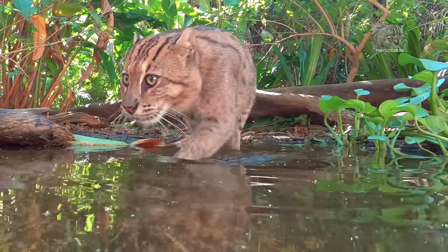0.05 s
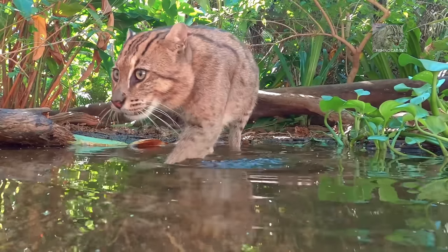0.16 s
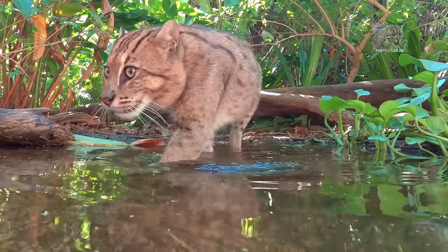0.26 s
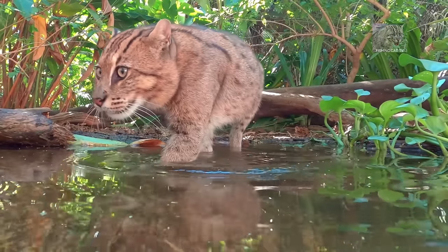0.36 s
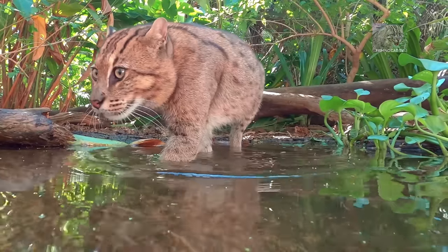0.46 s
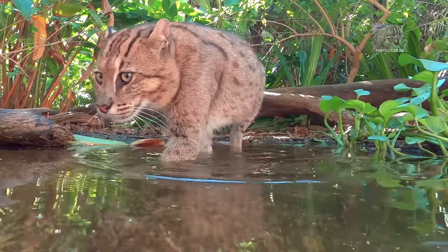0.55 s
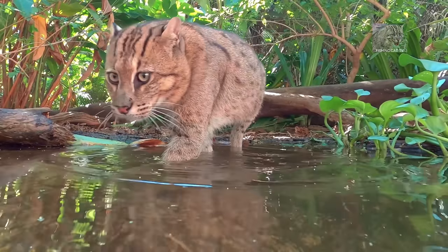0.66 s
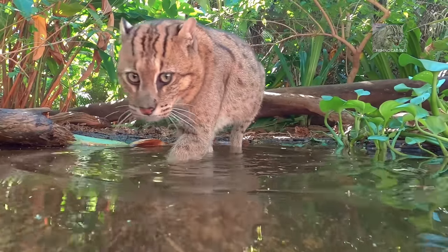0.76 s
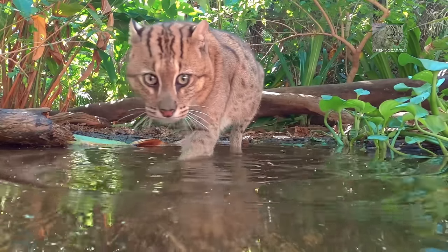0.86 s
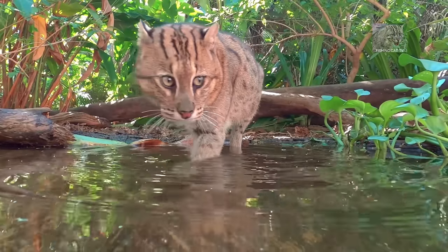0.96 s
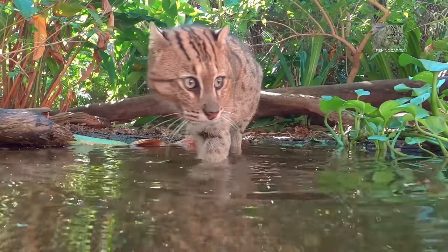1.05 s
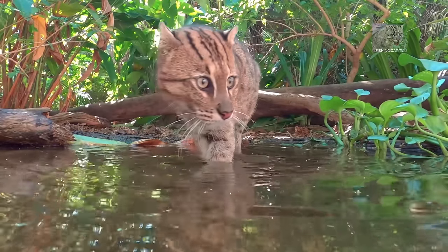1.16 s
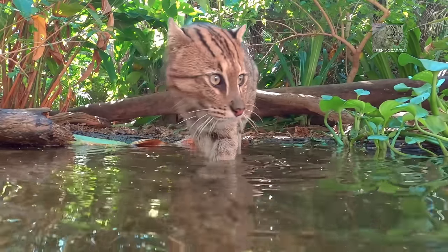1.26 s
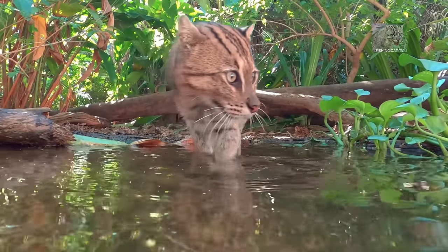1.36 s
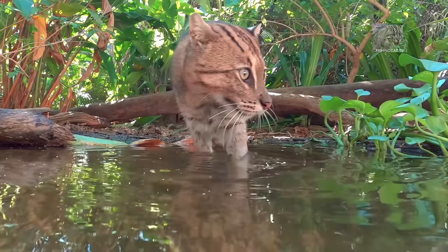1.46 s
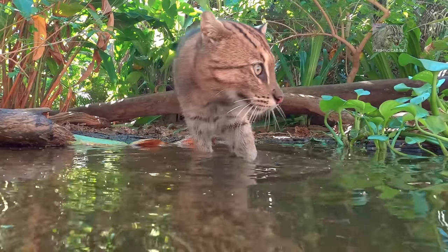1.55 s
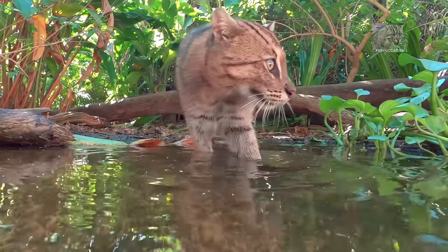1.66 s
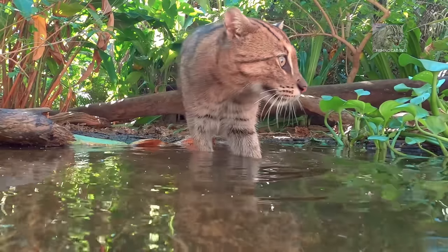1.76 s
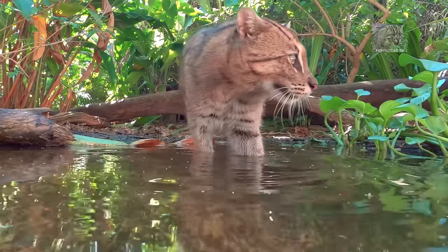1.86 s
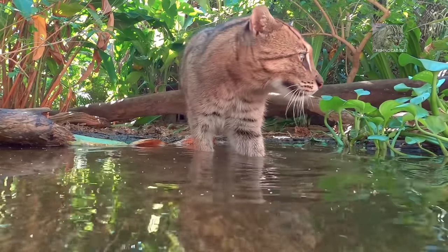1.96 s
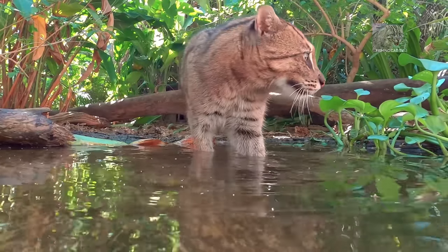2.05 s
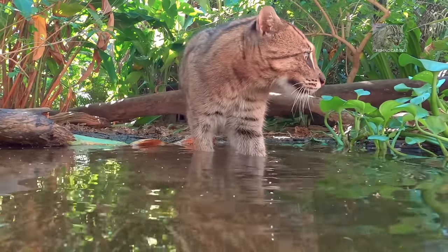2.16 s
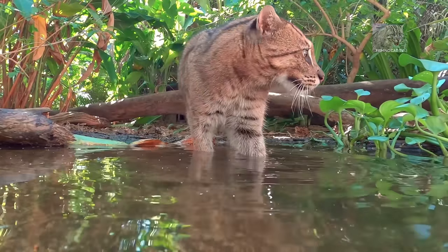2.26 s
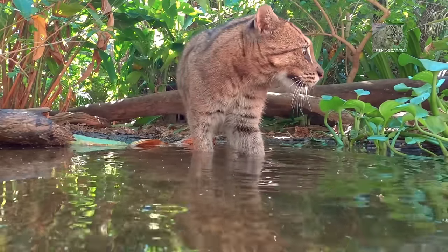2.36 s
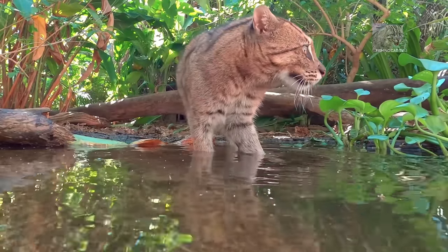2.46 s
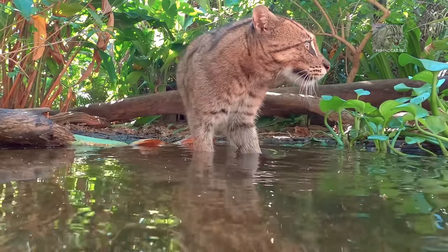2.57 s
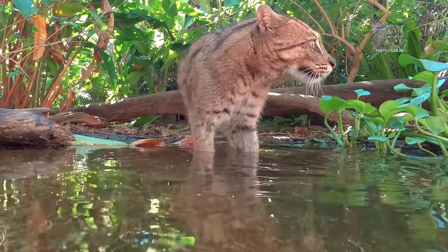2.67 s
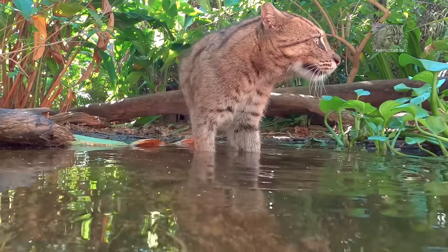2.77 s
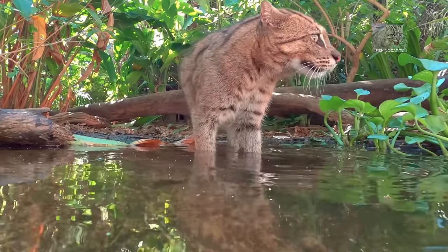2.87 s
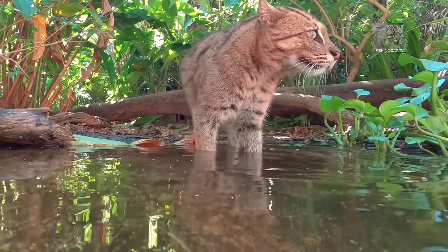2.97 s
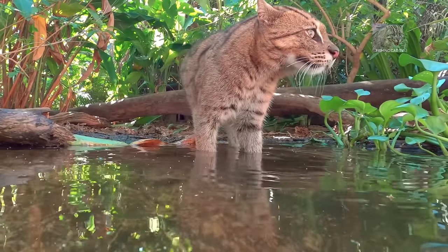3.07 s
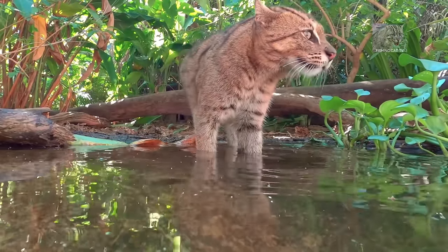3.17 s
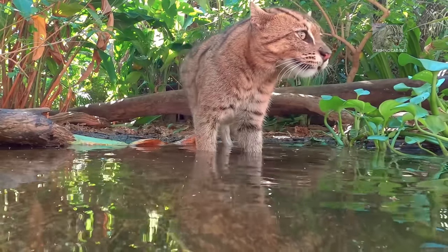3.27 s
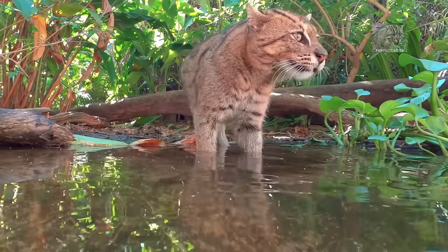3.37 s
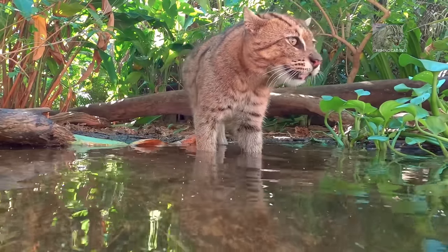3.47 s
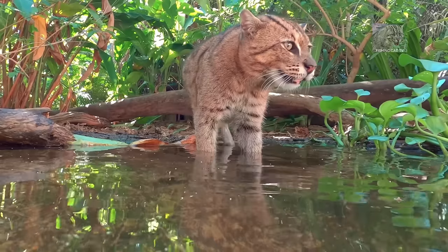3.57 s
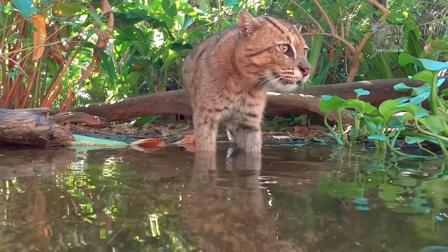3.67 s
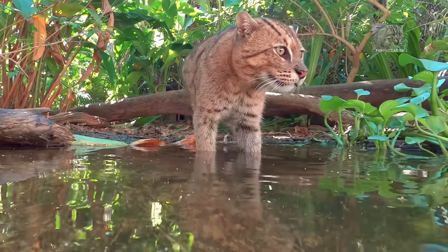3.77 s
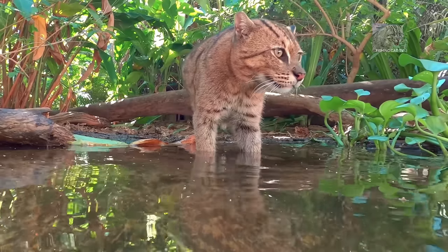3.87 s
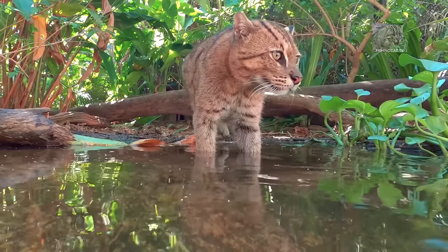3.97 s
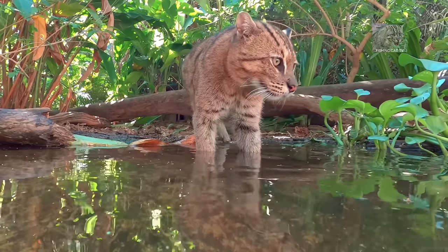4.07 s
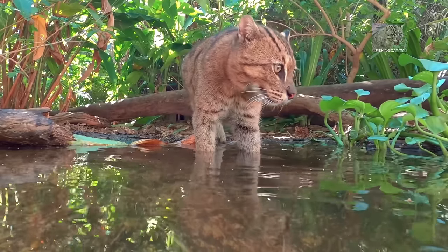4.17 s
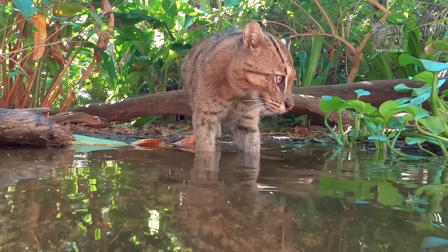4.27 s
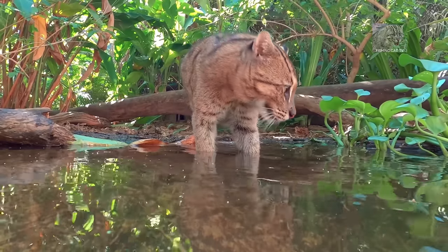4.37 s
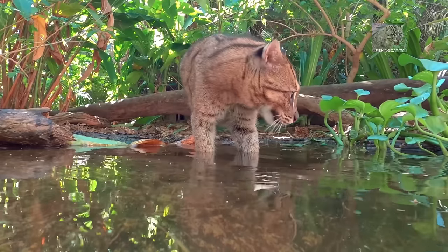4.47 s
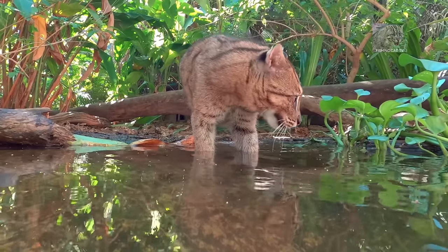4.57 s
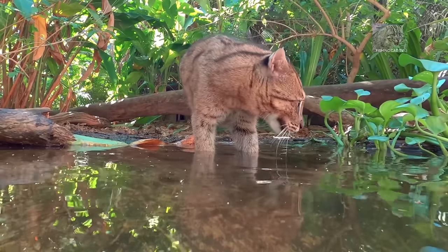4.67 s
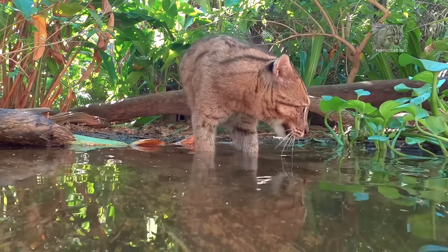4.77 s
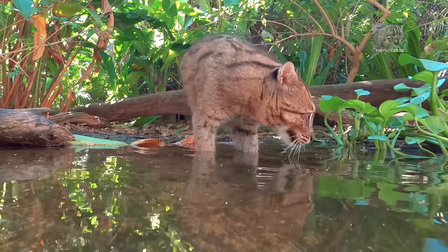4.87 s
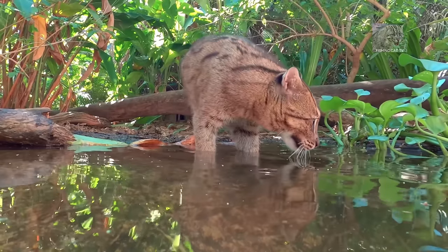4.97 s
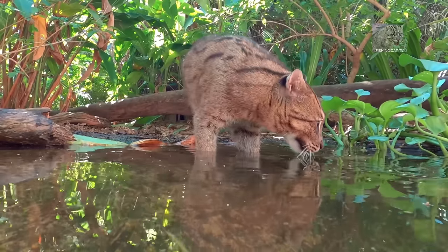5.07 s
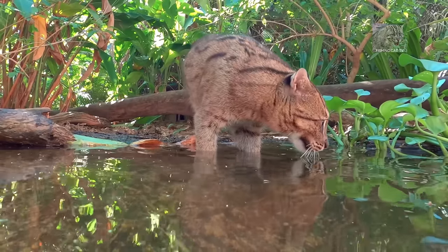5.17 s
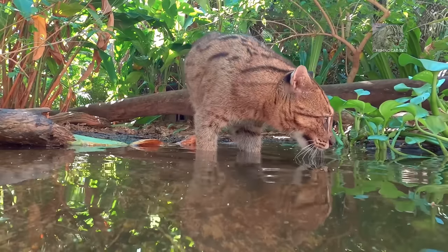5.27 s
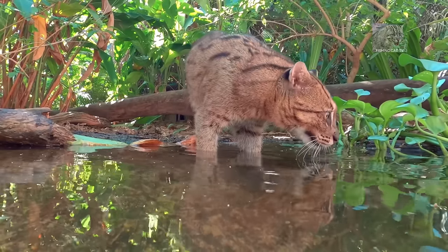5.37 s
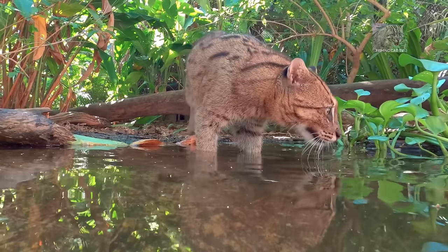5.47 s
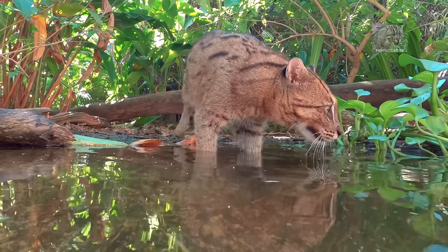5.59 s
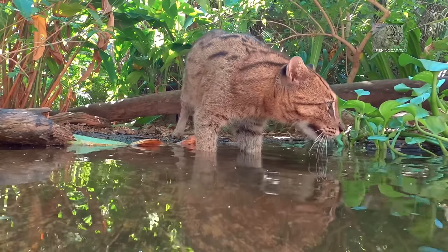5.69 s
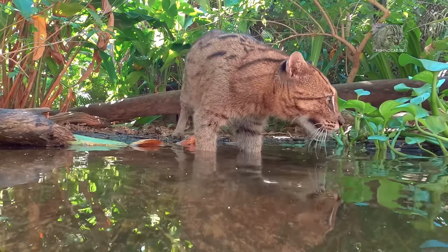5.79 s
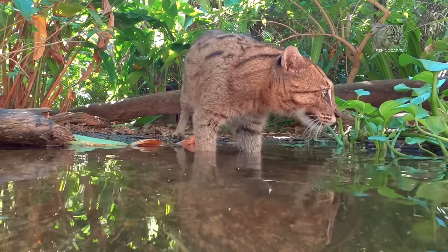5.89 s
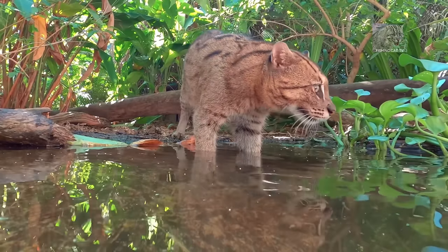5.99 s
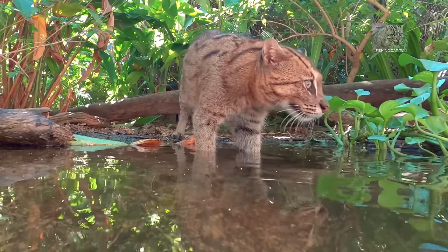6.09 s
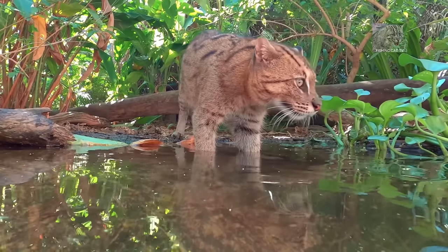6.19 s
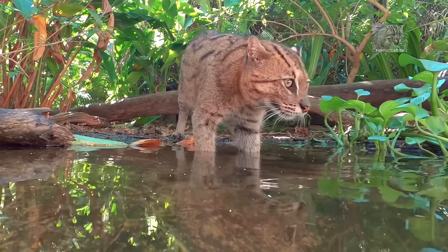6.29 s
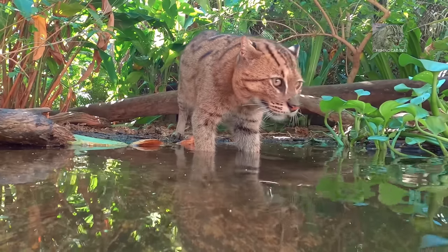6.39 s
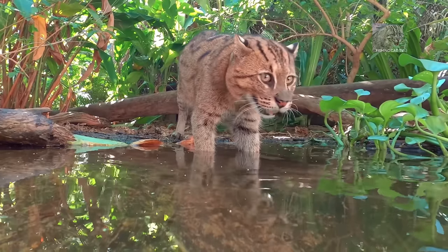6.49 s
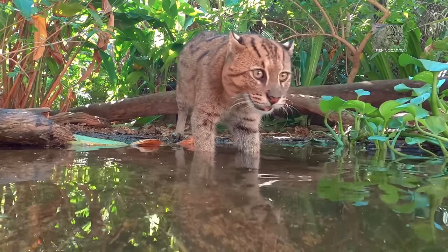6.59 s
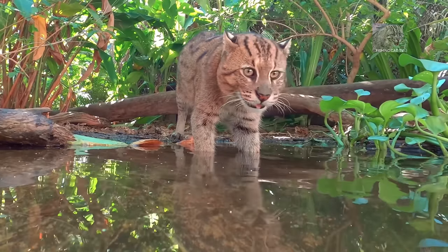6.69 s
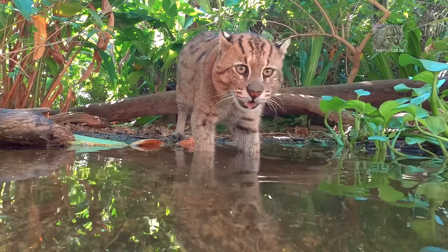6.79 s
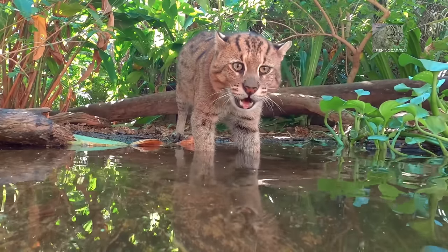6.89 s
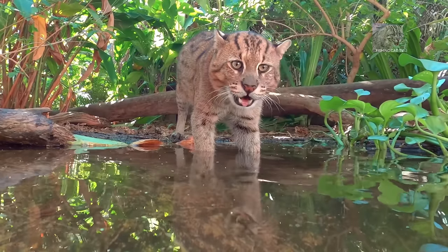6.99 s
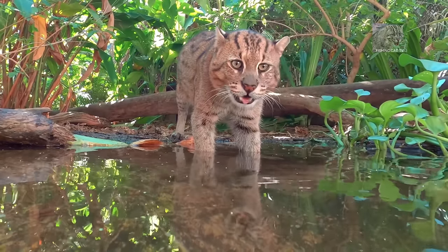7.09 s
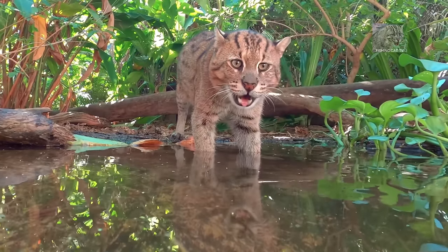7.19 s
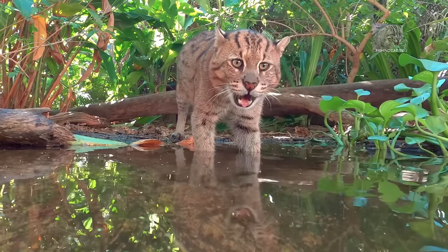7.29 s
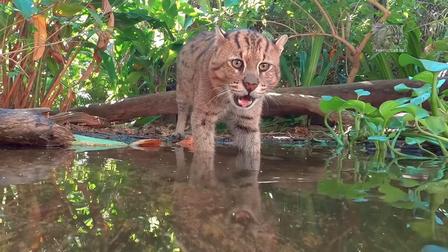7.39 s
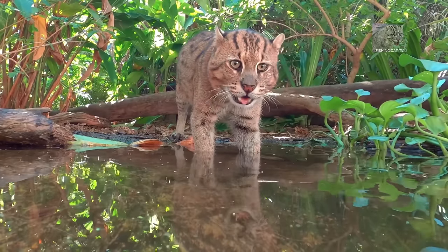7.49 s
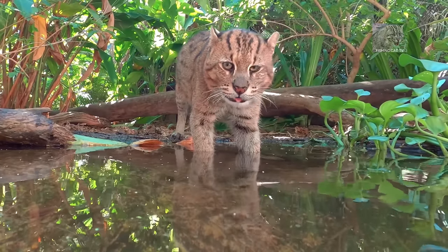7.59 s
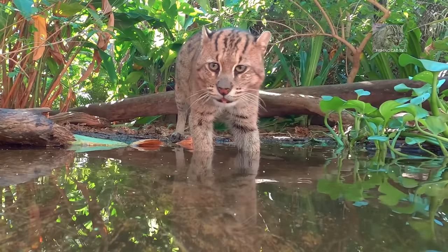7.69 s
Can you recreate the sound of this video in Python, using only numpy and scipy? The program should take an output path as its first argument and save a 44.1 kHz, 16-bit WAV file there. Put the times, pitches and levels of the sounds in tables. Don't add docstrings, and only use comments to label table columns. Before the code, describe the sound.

A wild cat close by gives gurgling throbs, whines and hoarse cries, ending loud and open-mouthed, while small birds whistle and trill in a thicket.

```python
import sys
import numpy as np
from scipy import signal
from scipy.io import wavfile
from scipy.ndimage import uniform_filter1d, minimum_filter1d

SR = 44100
rng = np.random.default_rng(int(sys.argv[2]) if len(sys.argv) > 2 else 0)


def volts_from_decibels(level):
    exponent = np.asarray(level, float) / 20
    return 10 ** exponent


def unload_wav(signal):
    wavfile.write(
        sys.argv[1],
        SR,
        np.round(np.clip(np.atleast_2d(signal).T, -1, 1) * 32767).astype(np.int16),
    )


N = 341421

# (frequency [Hz], level per Hz [dB])
AIR = [(12, -29.5), (20, 1), (122, -3), (201, 0.5), (686, -11.5), (931, -17), (1920, -13), (2470, -22.5),
       (3440, -24.5), (4070, -30.5), (5230, -29.5), (5840, -35.5), (8390, -40), (15500, -52)]
AIR_DB = -55
# (frequency [Hz], side level against centre [dB])
WIDE = [(60, -7.5), (110, -9.5), (200, -14.5), (380, -16), (700, -13), (1290, -16), (2380, -5.5),
        (4400, -4), (8120, -4.5), (15000, 6.5)]
# (time [s], low tone [Hz], low tone level [dB], octave level [dB])
HUM = [
    [(1.6, 85, -92, -76), (1.75, 86, -90, -64.5), (2.2, 89.5, -70.5, -67.5), (2.9, 90, -69, -72.5),
     (3.0, 90, -88, -85), (3.35, 91, -82, -68), (3.9, 91.5, -68.5, -63), (4.3, 91.5, -63, -75),
     (4.6, 91.5, -65.5, -68), (5.05, 91.5, -67, -60), (5.25, 91.5, -67.5, -65.5), (5.35, 91.5, -92, -88)],
]
# (centre [Hz], width [Hz], level [dB])
INSECT_BANDS = [
    (2760, 80, -86),
    (5300, 230, -89.5),
    (8390, 1200, -89.5),
]
# (start [s], end [s], level [dB])
CHIRRS = [
    (1.25, 1.45, -77),
    (1.7, 4.1, -70),
    (5.6, 6.9, -70),
]
BURST_S, BURST_DEPTH_DB = .412, 3.5
# (start [s], end [s], level [dB])
THIN = [
    (2.2, 3.1, -97),
]
# (start [s], end [s], level [dB])
BLUR = [
    (1.3, 1.5, -77),
    (1.8, 2.0, -81),
    (2.3, 2.58, -77.5),
    (4.15, 5.2, -77),
    (5.45, 5.95, -77),
]
THIN_HZ, BLUR_HZ = 9100, 2779.4
# (time [s], level [dB])
CROAKS = [(.02, -81), (.75, -66), (1.499, -57), (2.26, -55.5), (2.971, -55.5), (3.75, -57), (4.42, -61),
          (5.099, -64.5), (5.721, -58.5), (6.25, -56.5), (6.948, -53.5)]

# (time [s], pitch [Hz], level [dB])
CHIRP = [
    [(0, 2292, -69), (.012, 3481, -58), (.017, 3560, -49), (.048, 2924, -45.5), (.06, 2786, -53.5)],
    [(.074, 2780, -65), (.086, 3079, -53.5), (.098, 3070.5, -48), (.11, 2829.5, -50.5), (.122, 2704, -70.5)],
]
# (time [s], level [dB], right of centre [dB])
CHIRPS = [
    (.912, -1, 7.6),
    (5.978, -0.9, 5.5),
    (6.373, -0.17, 6.1),
]
# (time [s], pitch [Hz], level [dB])
WARBLE = [
    [(5.272, 2950, -66.5), (5.285, 2890, -59.5), (5.312, 2730, -64)],
    [(5.316, 2560, -52), (5.335, 2326, -54), (5.35, 2300, -52), (5.368, 2560, -58)],
    [(5.38, 3000, -64), (5.397, 2790, -59.5), (5.414, 2690, -58)],
    [(5.418, 2560, -49.5), (5.435, 2360, -53), (5.455, 2240, -54.5), (5.485, 2170, -69)],
    [(5.613, 2074, -65), (5.63, 1943, -53), (5.668, 2034, -49.5)],
]
# (time [s], length [s], from [Hz], to [Hz], peak [dB])
WARBLE_NOTES = [
    (5.516, 0.042, 1660, 2240, -61),
    (5.555, 0.061, 1956, 1730, -58.5),
]
# (time shift [s], level [dB], right of centre [dB])
WARBLES = [
    (0, 0, 3),
    (-5.075, -6.5, 3),
]
BUZZ_S, BUZZ_LENGTH_S, BUZZ_FROM_HZ, BUZZ_TO_HZ, BUZZ_DB, BUZZ_WIDTH_HZ = 5.2, 0.085, 1760, 2560, -53.5, 700
WARBLE_DRY_DB = -2.5
# (time [s], length [s], from [Hz], to [Hz], width [Hz], peak [dB])
BUZZES = [
    (0.489, 0.058, 2870, 3030, 246, -60),
    (0.711, 0.16, 2917, 3490, 164, -69.5),
    (0.835, 0.048, 2920, 3420, 320.6, -58.5),
    (5.087, 0.12, 1640, 1900, 500, -62),
    (0.121, .2, 2100, 2510, 890, -68),
    (0.383, 0.076, 1750, 1900, 500, -59.5),
    (3.985, .028, 3050, 3171, 200, -58),
]
# (time [s], pitch [Hz], level [dB])
WHISTLE = [
    [(0, 2760, -58), (.015, 2740, -52), (.05, 2735, -47), (.058, 2780, -52.5), (.068, 2300, -51)],
]
# (time [s], level [dB], right of centre [dB])
WHISTLES = [
    (1.236, -7.5, 2.6),
    (1.722, -3, 1.4),
    (2.237, -1, 2.3),
]
STUTTER_S, STUTTER_GAP_S, STUTTER_DB, STUTTER_FADE_DB, STUTTER_HZ = 0.089, .054, -54.5, 6, 2735
# (time [s], length [s], from [Hz], to [Hz], peak [dB])
NOTES = [(0.719, 0.1, 1761, 1722, -59.5), (5.677, 0.076, 1537, 1644, -59), (1.29, 0.05, 3530, 3430, -68),
         (1.31, 0.064, 1920, 1824, -64), (2.299, 0.022, 4300, 3540, -66), (4.017, 0.064, 1994, 1735, -60.5),
         (4.973, 0.07, 2060, 1770, -59), (5.045, 0.021, 1760, 1540, -58), (5.12, 0.041, 767, 797, -66),
         (5.19, 0.13, 819, 850, -66), (5.31, 0.071, 800, 790, -69), (5.115, 0.062, 1500, 1490, -65.5),
         (6.344, 0.086, 436, 425, -58), (6.574, 0.21, 412.1, 430.6, -59), (6.802, 0.051, 1755, 2145, -66),
         (6.858, 0.037, 2109, 1734, -55), (6.953, 0.13, 1970, 2024, -59), (7.439, 0.019, 2863, 2756, -57),
         (5.524, 0.03, 1700, 1490, -64), (5.823, 0.049, 1750, 1650, -61), (5.9, 0.083, 1747, 1700, -67)]
# (time shift [s], level [dB], right of centre [dB])
ONCE = [
    (0, 0, 1.5),
]
NOTE_EDGE_DB = -6
# (start [s], gap [s], pips [count], first pitch [Hz], last pitch [Hz])
TRILL = [
    (4.15, .054, 11, 2770, 2790),
    (4.742, .0765, 7, 2760, 2570),
]
TRILL_DB, TRILL_SWELL_DB = -78, 18
# (time [s], level [dB], pitch [Hz])
HIGH_PIPS = [
    (6.8103, -72, 3466),
    (7.3324, -47, 3270),
    (7.4022, -46, 3484),
    (7.4714, -45.5, 3450),
    (7.5448, -48.5, 3500),
]
# (time [s], peak [dB], centre minus 1000 [Hz])
TICKS = [(0.1962, -53, 6130), (0.272, -49.5, 4840), (0.851, -58, 4850), (0.915, -54, 5040),
         (3.281, -59.5, 7910), (3.426, -57, 4480), (3.6191, -49, 5630), (3.668, -51, 900),
         (3.795, -59, 8366), (3.969, -52, 800), (3.902, -56, 7930), (5.7997, -55, 3740), (5.983, -56, 5500),
         (6.3745, -61, 5670), (6.8778, -55.5, 6954), (7.543, -53.5, 5636), (5.801, -36.5, 594)]

# (time [s], effort [dB], pitch [Hz])
CRIES = [
    [(.281, -54, 434), (.286, -40.5, 442), (.298, -33, 441.6), (.322, -33.5, 446), (.35, -32.5, 450.6),
     (.378, -32.5, 448), (.398, -33.5, 434.8), (.411, -31.5, 414.4), (.42, -29, 395)],
    [(.555, -55.5, 361.6), (.585, -35.5, 384.4), (.622, -50.5, 591), (.643, -46, 640), (.712, -49, 657),
     (.73, -53.5, 647), (.81, -55.5, 616.3)],
    [(3.474, -52, 621), (3.485, -46, 570), (3.5, -49, 482), (3.514, -48, 467), (3.524, -59, 456)],
    [(3.795, -45, 233), (3.805, -28, 228), (3.836, -31, 266.7), (3.844, -23, 291.5), (3.86, -23.5, 310.5),
     (3.886, -21, 287), (3.894, -43, 287)],
    [(6.868, -37, 607.7), (6.876, -37, 573), (6.888, -31.5, 518.3), (6.893, -37, 491.3),
     (6.906, -37.5, 432.3), (6.914, -34.5, 378.8)],
]
# (time [s], effort [dB], pitch [Hz])
LONG_CRIES = [
    [(7.095, -24, 242.5), (7.104, -25.5, 247), (7.13, -29.5, 251.9), (7.165, -18.5, 281.9),
     (7.235, -12, 277.9), (7.27, -14.5, 285.8), (7.295, -12, 308.5), (7.346, -13, 256.5), (7.354, -23, 263)],
    [(7.5, -24.5, 251.5), (7.524, -26, 285.7), (7.542, -22, 295), (7.562, -18.5, 285), (7.6, -17.5, 297.2),
     (7.65, -13, 309.5), (7.688, -13, 310.7), (7.713, -19.5, 324.5), (7.742, -19, 317)],
]
# (time [s], effort [dB], pitch [Hz])
TRAIL = [
    [(7.356, -27, 259.6), (7.366, -31.5, 256.3), (7.378, -22.5, 249.6), (7.392, -21.5, 244),
     (7.399, -36.5, 235.3), (7.406, -40.5, 226.6)],
]
# (time [s], length [s], effort [dB], pitch [Hz], place of the peak [0-1])
THROBS = [(0.047, 0.061, -45, 408.1, 0.49), (0.104, 0.033, -36, 265.4, 0.59),
          (0.17, 0.034, -32.5, 261.6, 0.4), (0.225, 0.011, -38.5, 300.7, 0.43),
          (0.236, 0.033, -31.5, 259.3, 0.43), (0.428, 0.05, -36, 281, 0.44),
          (0.498, 0.051, -43, 266.5, 0.41), (0.808, 0.074, -49.5, 560, 0.41),
          (3.533, 0.052, -33, 298.6, 0.73), (3.607, 0.048, -32, 250.5, 0.41),
          (3.669, 0.011, -37, 250.2, 0.35), (3.68, 0.036, -29, 233.5, 0.41),
          (3.733, 0.052, -30.5, 227.7, 0.56), (3.893, 0.064, -29, 279, 0.58),
          (3.965, 0.066, -41.5, 291.7, 0.3), (4.067, 0.053, -50.5, 272.6, 0.51),
          (6.916, .016, -35, 129.5, .45), (6.929, 0.048, -36, 126.1, 0.49),
          (6.977, 0.049, -31.5, 256.1, 0.53), (7.035, 0.04, -27.5, 235.2, 0.51),
          (7.077, 0.017, -26, 123.1, .5), (7.408, 0.054, -28, 222.7, 0.47), (7.46, 0.046, -27, 247.2, .6)]
# (from [s], roughness [0 clear - 1 rasp])
RASP = [(0, .35), (.16, .55), (.284, .45), (.306, .07), (.416, .75), (.553, .15), (.625, .06), (.811, .8),
        (3.4, .25), (3.6, .62), (3.84, .05), (3.896, .35), (3.96, 1), (6.8, .22), (6.915, .3), (6.976, .55),
        (7.074, .25), (7.132, .6), (7.16, .05), (7.294, .62), (7.35, .75), (7.53, .015)]
# (time [s], mouth resonance [Hz], nose resonance [Hz])
MOUTH = [
    [(.04, 557, 5200), (.275, 750, 5300), (.285, 842, 5250), (.615, 830, 5270), (.63, 684, 5200),
     (.805, 718, 5093), (.83, 1240, 5200), (.89, 1300, 5090)],
    [(3.474, 560, 5040), (3.785, 632, 4978), (3.8, 704.6, 4930), (3.845, 875, 4703), (4.13, 836.6, 4795)],
    [(6.869, 1200, 5200), (6.912, 831.6, 5200), (6.935, 579.8, 5450), (7.07, 701.9, 5730),
     (7.09, 743, 5800), (7.15, 843.5, 6100), (7.29, 907.7, 6550), (7.31, 898.5, 6390), (7.402, 831, 5437)],
    [(7.403, 812.4, 5477), (7.43, 693, 5380), (7.46, 789.3, 5300), (7.49, 756, 5420), (7.52, 853.6, 5750),
     (7.56, 1015, 6200), (7.605, 1105, 6650), (7.645, 1214, 5540), (7.742, 1263, 5100)],
]
# (time [s], upper tones let through [0-1], ring of the lips [dB])
LIPS = [
    [(.04, 0.31, -44), (.28, 0.31, -49), (.41, 0, -50), (.44, 0.37, -38), (.89, 0.17, -42)],
    [(3.474, 0.3, -61), (3.8, 0.29, -47), (3.85, 0.21, -46), (3.9, 0.19, -45), (4.13, 0.3, -22)],
    [(6.867, 0.5, -36.5), (7.1, 0.19, -38.5), (7.19, 0.1, -43), (7.23, 0.08, -42), (7.27, 0.29, -35.5),
     (7.32, 0.19, -40), (7.39, 0.37, -35.5), (7.42, 0.3, -27), (7.46, 0.1, -27.5)],
    [(7.461, 0.18, -32), (7.545, 0.1, -33.5), (7.6, 0.21, -27), (7.64, 1.1, -21), (7.7, 1, -18),
     (7.742, 0.86, -16.5)],
]
# (time [s], lift of the hollow behind it [dB], muffled tone [Hz])
TONGUE = [
    [(7.52, -18, 2750), (7.55, -1, 2770), (7.61, 18.5, 2820), (7.645, 5.5, 3497), (7.69, -16, 3370),
     (7.72, -9.5, 2550), (7.742, -2, 2540)],
]
# (nose hiss under voice [dB], shut-mouth chest boom [dB], upper throat ring [dB])
VOICES = [
    (-55, 12.5, 1),
    (-42.5, 9.5, 7),
    (-50, 2.5, 7.5),
    (-49, 7, 9.5),
]
LEAK = [
    0.041,
    0.042,
    .25,
    .2,
]
# (frequency [Hz], level [dB])
THROAT = [(90, -34), (230, -14), (600, -5), (1400, -5), (1680, -9), (2050, -34), (3100, -43), (4300, -62),
          (8500, -68), (13000, -95)]
# (start [s], end [s])
SLACK_S = (6.86, 6.916)
# (time [s], ring [Hz], level [dB])
SLACK_RING = [
    [(6.868, 1805, 4.5), (6.89, 1553, -0.5), (6.915, 1457, -6), (6.97, 1338, -15.5), (7.07, 1230, -15),
     (7.11, 1260, -29.5)],
]
SPRAY_HZ = [
    4900,
    6800,
    8400,
]

SHUT_HZ, OPEN_HZ, BOOM_LOSS_DB = 640, 939, 29
GAPE_HZ, GAPE_LOSS_DB, GAPE_BODY_DB = 957, 8.5, 7
SHUT_RING_DB, GAPE_RING_DB = -4, 7.5
SHUT_HISS_DB, RASP_HISS_DB = -15, 13
HISS_FOLLOW, LOUD_DB = 0.62, -26.5
HISS_FLICKER_DB, SPRAY_DB = 3, -3
RASP_WOBBLE, RASP_RING_DB, RASP_THROAT_DB = 0.15, 1.5, 4.5
RASP_DAMP, RASP_BODY_DB, RASP_BODY_WIDTH_HZ = .9, 10.5, 130
PARTED_RASP_DB = 12
WHINE_HZ, WHINE_RING_HZ, WHINE_RING_DB = 485, 1900, -16
LIP_BREATH = 1.6
HOLLOW_HZ, MUFFLE = 850, 1
LIMIT_DB, LIMIT_SHARE = -12, 0.65


def evened(x, span=0):
    power = uniform_filter1d(x ** 2, span) if span else np.mean(x ** 2)
    return x / np.sqrt(abs(power) + 1e-14)


def read(points, hz):
    f, value = np.transpose(points)
    return np.interp(np.log(hz + 1), np.log(f + 1), value)


def along(tables):
    s, *columns = np.concatenate(tables).T
    return [np.interp(np.arange(N) / SR, s, c) for c in columns]


def add(mix, s, sound):
    part = mix[..., round(s * SR):][..., :sound.shape[-1]]
    part += sound[..., :part.shape[-1]]


def resonate(x, hz, width):
    turn = np.exp(2j * np.pi * np.cumsum(hz * np.ones(len(x))) / SR)
    r = np.exp(-np.pi * width / SR)
    return 2 * (turn * signal.lfilter([1 - r], [1, -r], x / turn + 1e-18)).real


def twice(x, hz, width):
    return resonate(resonate(x, hz, width), hz, width)


def filtered(x, order, hz, kind):
    return signal.sosfilt(signal.butter(order, hz, kind, fs=SR, output="sos"), x)


def colour(x, points):
    log_gain = np.log(volts_from_decibels(read(points, abs(np.fft.fftfreq(8192, 1 / SR)))))
    response = np.fft.ifft(np.exp(np.conj(signal.hilbert(log_gain)))).real[:2048]
    return signal.oaconvolve(x, response)[:N]


def drift(per_s):
    return evened(twice(rng.standard_normal(N), 0, per_s))


def panned(x, right_db):
    return x * volts_from_decibels(np.array([[-right_db / 2], [right_db / 2]]))


def echoes(x, t60, start):
    t = np.arange(SR // 2) / SR
    tail = rng.standard_normal((len(x), len(t))) * volts_from_decibels(-60 * t / t60) * (t > start)
    return signal.fftconvolve(x, tail / np.linalg.norm(tail[0]), axes=1)[:, :N]


def air():
    frames, hz = N // 256 + 5, np.fft.rfftfreq(1024, 1 / SR)
    a, b, c, d, patches = rng.standard_normal((frames, 513, 5)).T
    patches = evened(uniform_filter1d(uniform_filter1d(patches, 10, 0), 12, 1))
    noise = np.array([a + 1j * b, volts_from_decibels(read(WIDE, hz))[:, None] * (c + 1j * d)])
    noise = noise * volts_from_decibels(read(AIR, hz)[:, None] + 1.9 * patches)
    mid, side = signal.istft(noise, nperseg=1024, noverlap=768)[1][:, :N]
    return volts_from_decibels(AIR_DB - 3.5) * np.array([mid + side, mid - side]) / mid.std()


def hum():
    hz, low_db, octave_db = along(HUM)
    turns = 2 * np.pi * np.cumsum(hz * (1 + .004 * drift(3))) / SR
    low = volts_from_decibels(low_db + 2.0 * drift(4)) * np.sin(turns)
    octave = volts_from_decibels(octave_db + 2.0 * drift(4)) * np.sin(2 * turns)
    return np.sqrt(2) * (low + octave)


def bouts(rows):
    t = np.arange(N) / SR
    level = sum(volts_from_decibels(db) * (t > a) * (t < b) for a, b, db in rows)
    return 20 * np.log10(uniform_filter1d(level, 4000) + 1e-5)


def chorus_level():
    croak = np.zeros(N)
    for s, db in CROAKS:
        add(croak, s, volts_from_decibels(db + 1.5) * signal.windows.tukey(3600, .5))
        add(croak, s + 0.073, volts_from_decibels(db) * signal.windows.tukey(6000, .5))
        add(croak, s + 0.16, volts_from_decibels(db - 5.0 - 60 * np.arange(9000) / SR / 3.1))
    return 20 * np.log10(croak + 1e-5)


def distance():
    since = np.arange(N) / SR - CHIRRS[1][0]
    burst = np.clip(2.5 * np.sin(2 * np.pi * since / BURST_S) + 0.59, 0, 1)
    chirr_db = bouts(CHIRRS) - BURST_DEPTH_DB * (1 - burst)
    chorus_db = chorus_level()
    bands = [(1529, 110, chorus_db - 14.0), (2050, 520, chorus_db - 11.5), (3573, 140, chirr_db - 7),
             (THIN_HZ, 120, bouts(THIN)), (BLUR_HZ, 110, bouts(BLUR))]
    out = np.zeros((2, N))
    for hz, width, db in bands + INSECT_BANDS:
        mid, side = (evened(twice(v, hz, width)) for v in rng.standard_normal((2, N)))
        side *= volts_from_decibels(read(WIDE, hz))
        out += volts_from_decibels(db + 1.0 * drift(33)) * np.array([mid + side, mid - side])
    return out


def note(rows):
    s, hz, db = np.transpose(rows)
    t = np.arange(s[0], s[-1], 1 / SR)
    waver = 1 + 0.13 * uniform_filter1d(rng.standard_normal(len(t)), 150)
    pitch = uniform_filter1d(np.interp(t, s, hz), 300, mode="nearest") * waver
    tone = np.sin(2 * np.pi * np.cumsum(pitch) / SR)
    return np.sqrt(2) * volts_from_decibels(np.interp(t, s, db)) * tone * signal.windows.tukey(len(t), .15)


def slide(s, length, from_hz, to_hz, db):
    edge_db = db + NOTE_EDGE_DB
    return [(s, from_hz, edge_db), (s + length / 2, (from_hz + to_hz) / 2, db), (s + length, to_hz, edge_db)]


def buzz(length, from_hz, to_hz, width, db):
    rise = np.linspace(from_hz, to_hz, round(length * SR))
    breath = rng.standard_normal(9000)[:len(rise)]
    return volts_from_decibels(db) * evened(twice(breath, rise, width)) * np.hanning(len(rise))


def sing(mix, song, times):
    for s, db, right_db in times:
        for rows in song:
            add(mix, s + rows[0][0], panned(volts_from_decibels(db) * note(rows), right_db))


def pips(mix):
    for start, gap, count, first, last in TRILL:
        for s, hz in np.linspace((start, first), (start + gap * (count - 1), last), count):
            db = TRILL_DB + TRILL_SWELL_DB * (s - TRILL[0][0])
            add(mix, s, panned(note([(0, 1.04 * hz, db + 1), (.012, hz, db - 5), (.03, 1.01 * hz, db - 15)]), 10.4))
    for s, db, hz in HIGH_PIPS:
        add(mix, s, panned(note([(0, .95 * hz, db - 4), (.01, hz, db - 15), (.025, 1.01 * hz, db - 30)]), 3))


def birds():
    far, near = np.zeros((2, 2, N))
    stutter = [slide(STUTTER_S + k * STUTTER_GAP_S, 0.052, STUTTER_HZ, STUTTER_HZ,
                     STUTTER_DB - k * STUTTER_FADE_DB) for k in range(5)]
    sing(far, CHIRP, CHIRPS)
    sing(far, WHISTLE + stutter, WHISTLES)
    sing(far, [slide(*row) for row in NOTES], ONCE)
    pips(far)
    for s, *shape in BUZZES:
        add(near, s, panned(buzz(*shape), 1.5))
    for s, db, right_db in WARBLES:
        opening = buzz(BUZZ_LENGTH_S, BUZZ_FROM_HZ, BUZZ_TO_HZ, BUZZ_WIDTH_HZ, db + BUZZ_DB)
        add(near, s + BUZZ_S, panned(opening, right_db))
    sing(near, WARBLE + [slide(*row) for row in WARBLE_NOTES], WARBLES)
    return far + near + volts_from_decibels(-5.5) * echoes(far + volts_from_decibels(WARBLE_DRY_DB) * near, 0.78, 0.024)


def ticks():
    out, t = np.zeros(N), np.arange(300) / SR
    for s, db, hz in TICKS:
        snap = rng.standard_normal(300) * volts_from_decibels(-60 * t / 0.01) * np.minimum(t / .0004, 1)
        for _ in range(3):
            snap = resonate(snap, hz + 1000, min(4000, hz + 900))
        add(out, s, volts_from_decibels(db - 6.0) * evened(snap) / 3)
    return out


def throb(s, length, db, hz, lean):
    return [(s, db - 15.0, 1.1 * hz),
            (s + max(lean - .36, .04) * length, db - 2.0, 0.96 * hz),
            (s + lean * length, db + 0.0, hz),
            (s + (.45 + .62 * min(lean, .65)) * length, db - 2.5, .96 * hz),
            (s + 0.9 * length, db - 18.5, 0.85 * hz)]


def folds(hz, rough):
    turns = np.cumsum(hz * (1 + .12 * rough * drift(90))) / SR
    at = np.flatnonzero(np.diff(np.floor(turns))) + 1
    late, size = rng.standard_normal((6000, 2))[:len(at)].T
    period = SR / hz[at]
    place = at - turns[at] % 1 * period + .1 * rough[at] * late * period
    beat = 3.5 * (-1.) ** np.arange(len(at))
    size = volts_from_decibels(rough[at] * (3 * np.clip(size, -2.5, 1.2) + beat))
    grid = np.clip(np.floor(place).astype(int)[:, None] + np.arange(-7, 9), 0, N + 9)
    off = grid - place[:, None]
    shape = size[:, None] * np.sinc(off) * np.cos(np.pi * off / 16) ** 2
    pulses = np.bincount(grid.ravel(), shape.ravel(), N + 10)[:N]
    puffs = rng.standard_normal(N) * (.3 + np.exp(-(turns % 1) / .3))
    return evened(pulses, 1300) + .9 * rough ** 2 * puffs, puffs


def chest_and_mouth(drive, rough, mouth, gape, yawn, slack, parted, boom_db, ring_db):
    shaken = mouth * (1 + RASP_WOBBLE * rough * drift(30))
    damped = np.clip(RASP_DAMP * rough + slack, 0, 1)
    tract = drive + volts_from_decibels(17.0) * (1 - damped) * resonate(drive, shaken, 57)
    tract += volts_from_decibels(RASP_BODY_DB) * damped * resonate(drive, shaken, RASP_BODY_WIDTH_HZ)
    tract -= yawn * volts_from_decibels(GAPE_BODY_DB) * resonate(drive, 0.54 * mouth, 267.6)
    ring_db = ring_db + (RASP_RING_DB + PARTED_RASP_DB * parted) * rough
    ring_db = ring_db + SHUT_RING_DB * np.clip(1 - gape, 0, 1) + GAPE_RING_DB * yawn
    upper_hz = np.clip(1.95 * mouth, 1100, np.maximum(1450, 1.29 * mouth))
    tract -= volts_from_decibels(ring_db) * resonate(drive, upper_hz, 140)
    tract = filtered(tract, 2, 350, "high")
    throat_db = 2.0 + RASP_THROAT_DB * rough - GAPE_LOSS_DB * yawn
    tract += volts_from_decibels(throat_db) * resonate(drive, 660, 210)
    chest_db = boom_db - BOOM_LOSS_DB * np.clip(gape, 0, 1.8)
    return colour(tract + volts_from_decibels(chest_db + 9.0) * resonate(drive, 305, 99), THROAT)


def through_lips(tract, drive, puffs, rough, mouth, whine, leak):
    parted, lip_db = along(LIPS)
    half = signal.sosfilt(signal.ellip(6, .5, 45, 1530, fs=SR, output="sos"), tract)
    wide = np.clip(np.maximum(parted, whine), .01, 1)
    tract = wide * tract + (1 - wide) * half
    closed = filtered(tract, 8, 1170, "low")
    whine_ring = resonate(resonate(drive, WHINE_RING_HZ, 578), WHINE_RING_HZ, 700)
    tract += volts_from_decibels(WHINE_RING_DB) * np.clip(whine, 0, 1) * whine_ring
    blown = drive + LIP_BREATH * (rough + 0.14) * puffs
    tract += volts_from_decibels(lip_db) * resonate(resonate(resonate(blown, 2200, 980), 1700, 1300), 2600, 2200)
    tract += volts_from_decibels(along(TONGUE)[0]) * resonate(tract, HOLLOW_HZ, 200)
    opening = np.clip(np.maximum((mouth - 720) / 160, whine), leak, 1)
    return opening * tract + (1 - opening) * closed


def breath_hiss(drive, puffs, rough, nose, yawn, nose_db):
    breath = drive + (1.1 * (1 - .72 * yawn) + 0.87 * rough) * puffs
    nose = nose * (1 + .02 * drift(18))
    hiss = resonate(resonate(breath, nose, 800), nose, 1400)
    hiss = filtered(hiss, 4, [3000, 10500], "band")
    spray = np.zeros(N)
    for k, hz in enumerate(SPRAY_HZ):
        cavity = resonate(resonate(breath, hz, 900), hz, 1400)
        spray += (-1) ** k * cavity * volts_from_decibels(-3.5 * k + 2.5 * drift(25))
    flicker = volts_from_decibels(nose_db + 2.5 + HISS_FLICKER_DB * drift(35))
    return flicker * (evened(hiss, 900) + volts_from_decibels(SPRAY_DB) * evened(spray, 900))


def cat():
    t = np.arange(N) / SR
    bursts = CRIES + LONG_CRIES + TRAIL + [throb(*row) for row in THROBS]
    effort_db, hz = along(sorted(bursts, key=lambda rows: rows[0][0]))
    effort_db = uniform_filter1d(effort_db, 180)
    since, rasp = np.transpose(RASP)
    rough = uniform_filter1d(rasp[np.searchsorted(since, t, "right") - 1], 450)
    drive, puffs = folds(hz, rough)

    mouth, nose = [uniform_filter1d(c, 400) for c in along(MOUTH)]
    call = np.maximum(np.searchsorted([rows[0][0] for rows in MOUTH], t) - 1, 0)
    hiss_db, boom_db, ring_db = uniform_filter1d(np.array(VOICES, float)[call].T, 400)
    leak = uniform_filter1d(np.array(LEAK)[call], 400)
    gape = (mouth - SHUT_HZ) / (OPEN_HZ - SHUT_HZ)
    slack = (t > SLACK_S[0]) * (t < SLACK_S[1])
    yawn = np.clip((mouth - GAPE_HZ) / 320, 0, 1) * (1 - slack)
    whine = (hz - WHINE_HZ) / 90

    parted = along(LIPS)[0]
    tract = chest_and_mouth(drive, rough, mouth, gape, yawn, slack, parted, boom_db, ring_db)
    tract = through_lips(tract, drive, puffs, rough, mouth, whine, leak)
    sink_hz, sink_db = along(SLACK_RING)
    sinking = volts_from_decibels(sink_db) * (t > SLACK_S[0]) * resonate(resonate(drive, sink_hz, 330), sink_hz, 450)
    voice = -volts_from_decibels(effort_db) * evened(tract - sinking, 1100)

    hiss_db = hiss_db + SHUT_HISS_DB * np.clip(1 - gape, 0, 1)
    nose_db = LOUD_DB + hiss_db + RASP_HISS_DB * rough + HISS_FOLLOW * (effort_db - LOUD_DB)
    voice += breath_hiss(drive, puffs, rough, nose, yawn, nose_db)
    between = resonate(resonate(resonate(drive + (0.25 + rough) * puffs, 2970, 330), 2950, 900), 4400, 1600)
    voice += volts_from_decibels(.5 * (nose_db + effort_db) - 20.0) * evened(between, 900)
    gaping = np.clip(4 * yawn, 0, 1) * (t > TONGUE[0][0][0])
    voice -= MUFFLE * gaping * resonate(voice, along(TONGUE)[1], 890)

    sounding = sum((t > rows[0][0]) & (t < rows[-1][0] + .02) for rows in MOUTH)
    voice *= uniform_filter1d((sounding > 0) * 1., 200, mode="nearest")
    return voice + volts_from_decibels(-19) * echoes(voice[None], .18, .008)


def scene():
    return air() + hum() + distance() + birds() + ticks() + cat()


def low_pass(x):
    return signal.sosfilt(signal.butter(12, 15630, fs=SR, output="sos"), x)


def record(dry):
    hiss = filtered(rng.standard_normal((2, N)), 2, 9000, "high")
    peak_db = 20 * np.log10(-minimum_filter1d(-abs(dry).max(0), size=500) + 1e-9)
    limit = volts_from_decibels(-LIMIT_SHARE * uniform_filter1d(np.maximum(peak_db - LIMIT_DB, 0), size=400))
    fade = np.minimum(np.arange(N)[::-1] / 3, 1)
    return low_pass((limit * dry + volts_from_decibels(-83.0) * hiss) * fade)


dry = scene()
out = record(dry)
unload_wav(out)
```